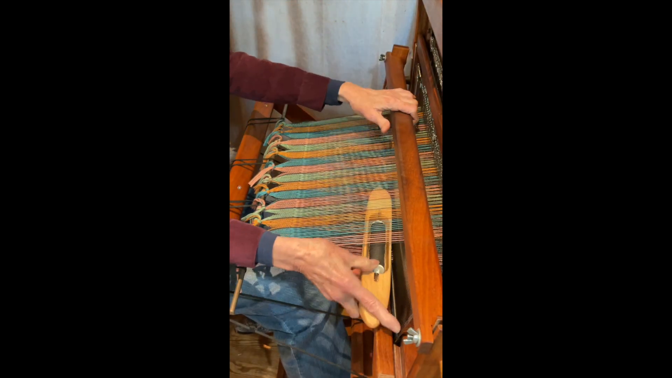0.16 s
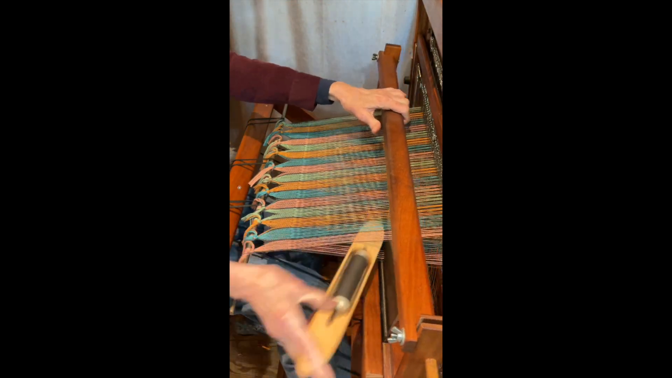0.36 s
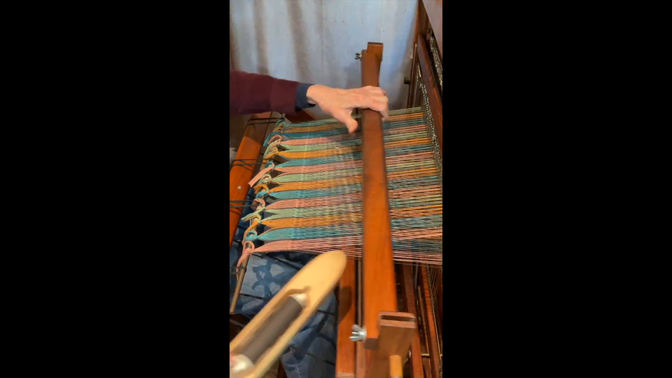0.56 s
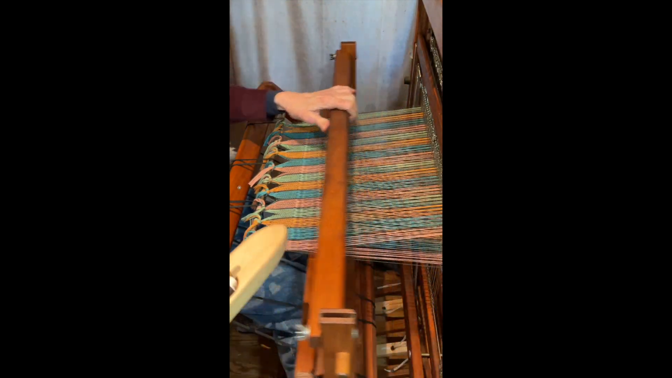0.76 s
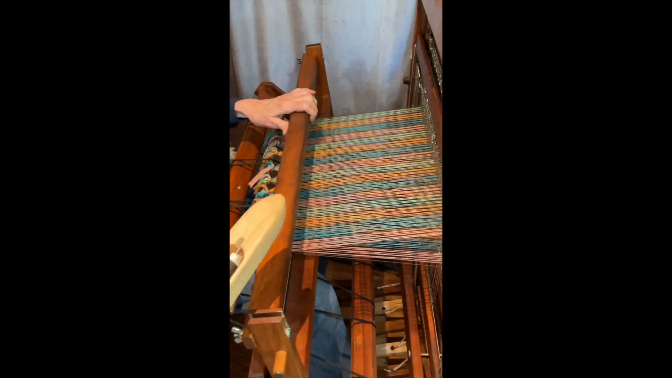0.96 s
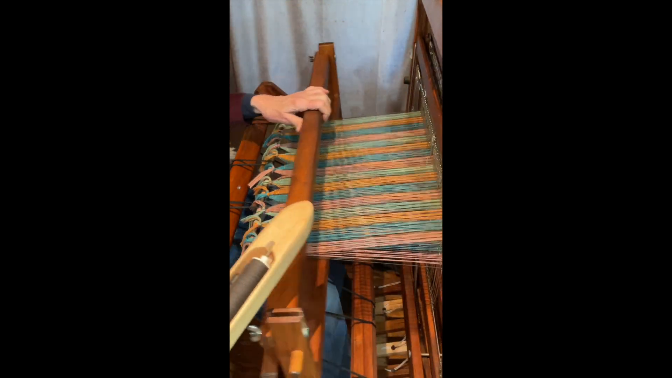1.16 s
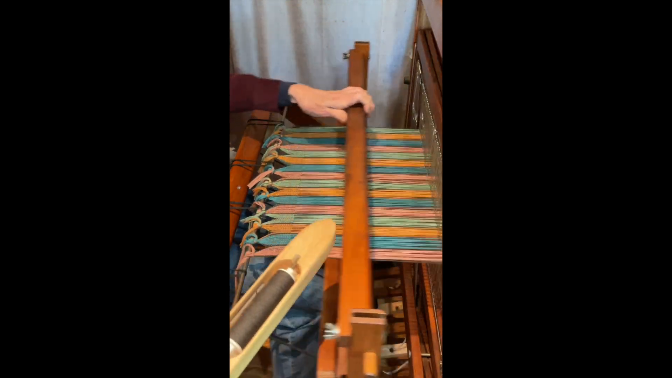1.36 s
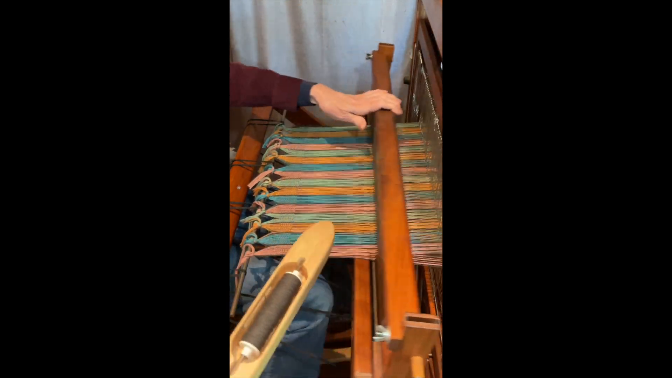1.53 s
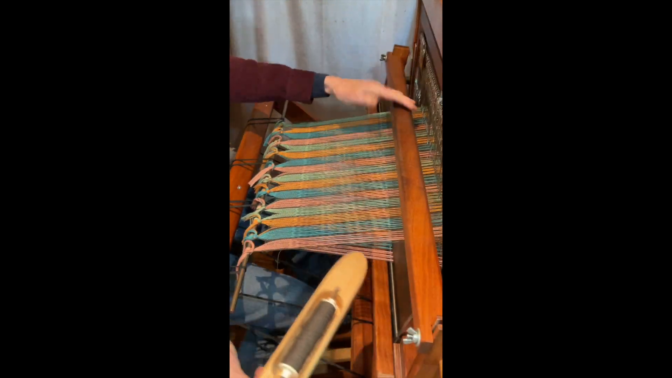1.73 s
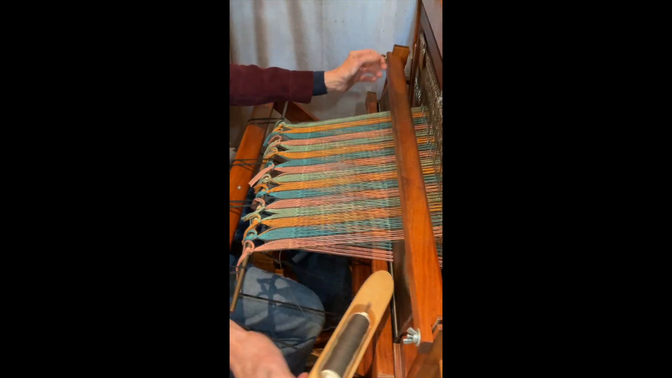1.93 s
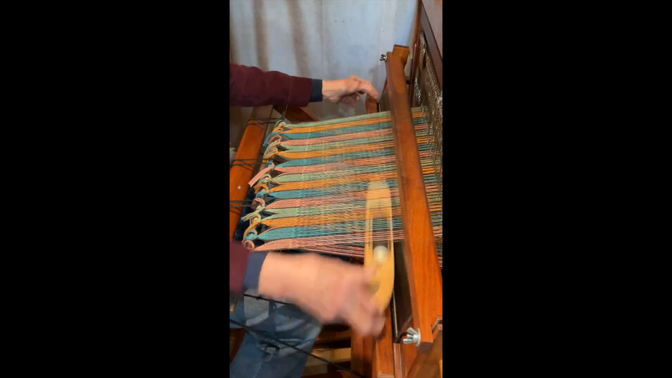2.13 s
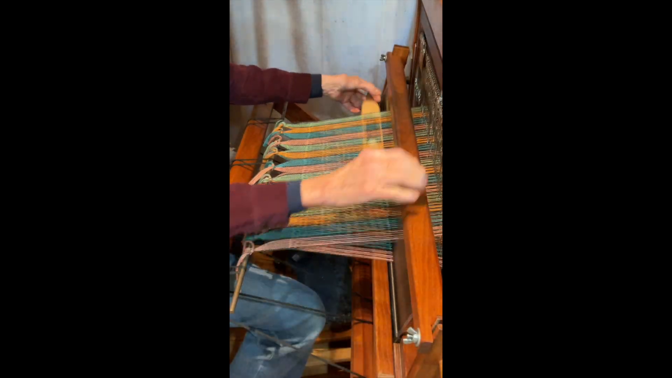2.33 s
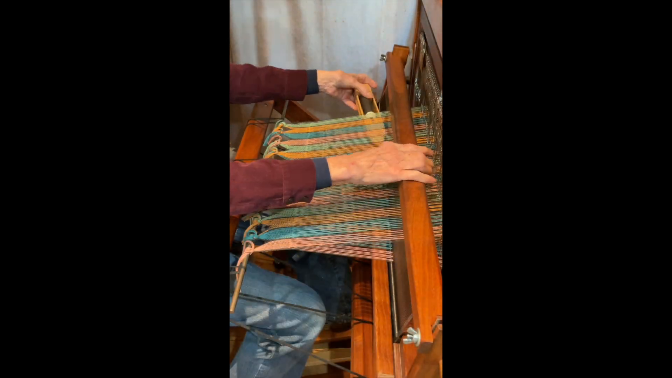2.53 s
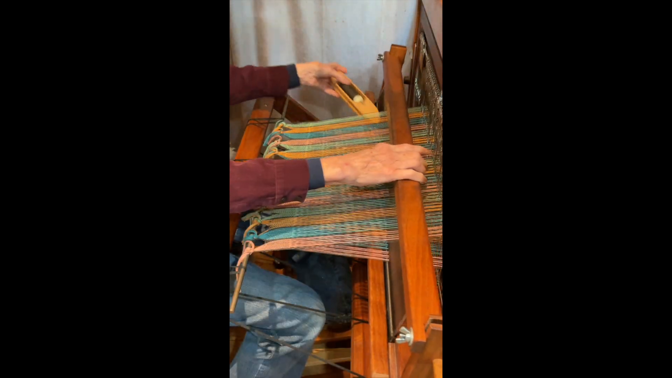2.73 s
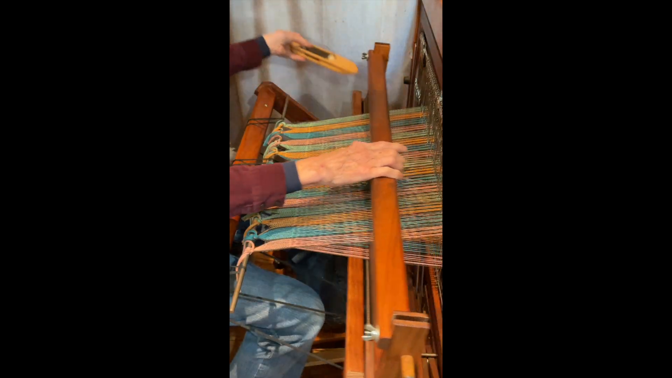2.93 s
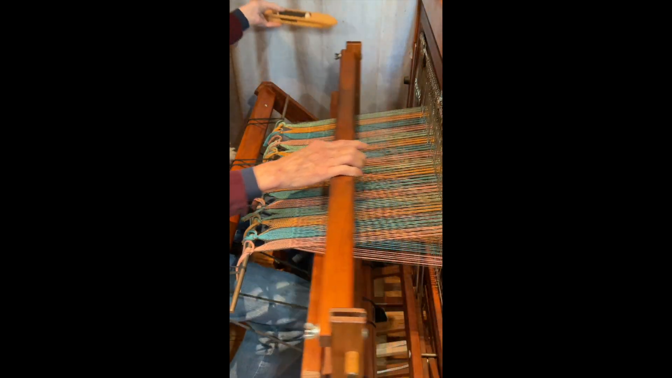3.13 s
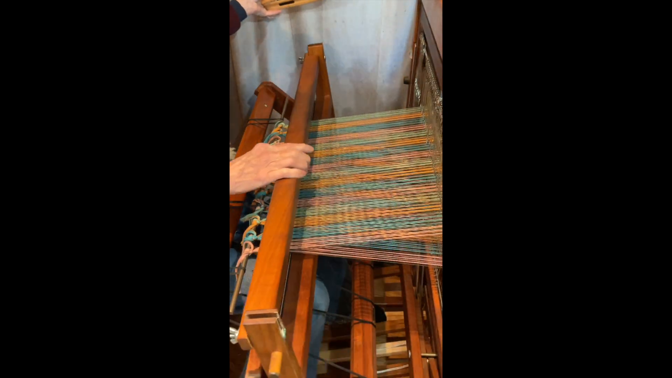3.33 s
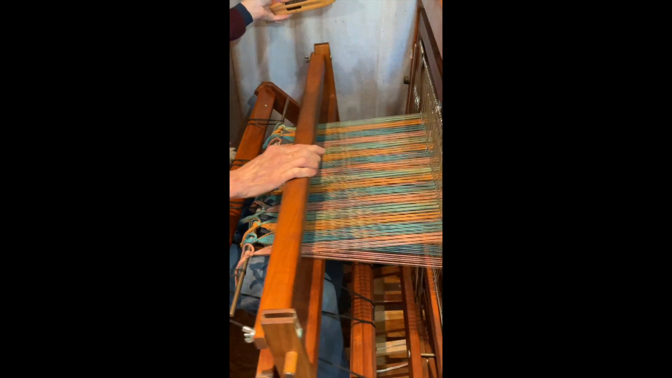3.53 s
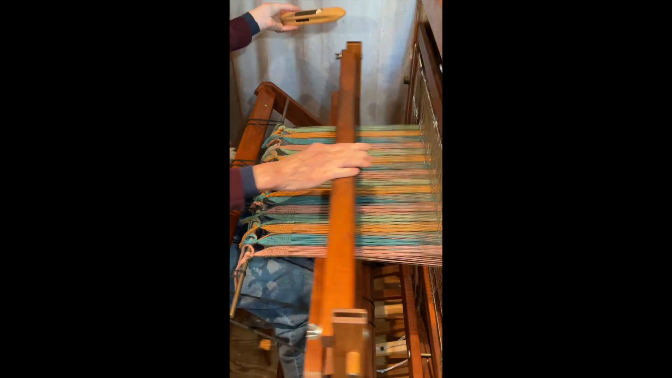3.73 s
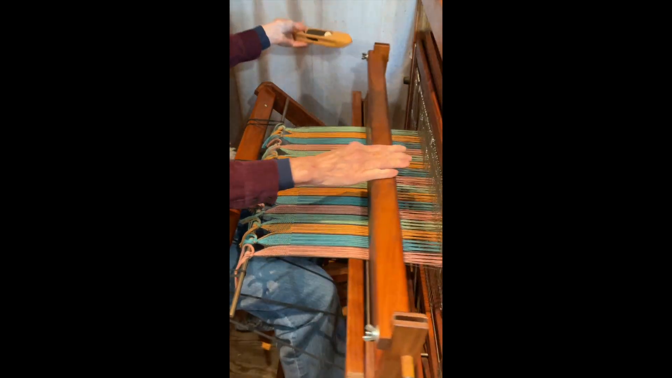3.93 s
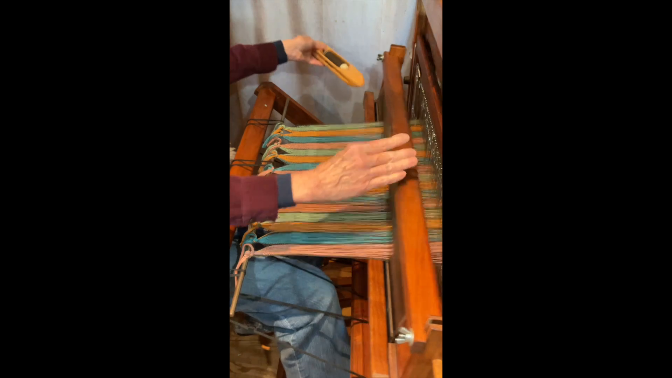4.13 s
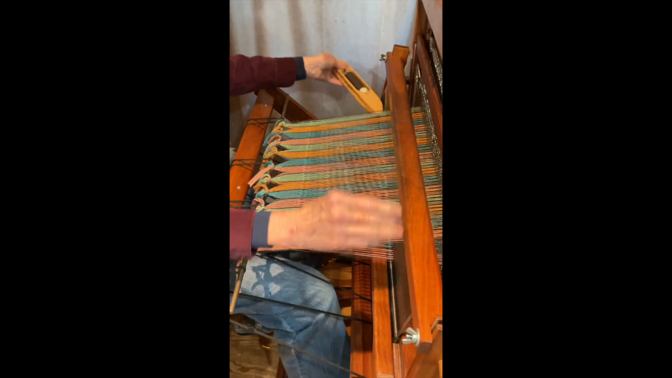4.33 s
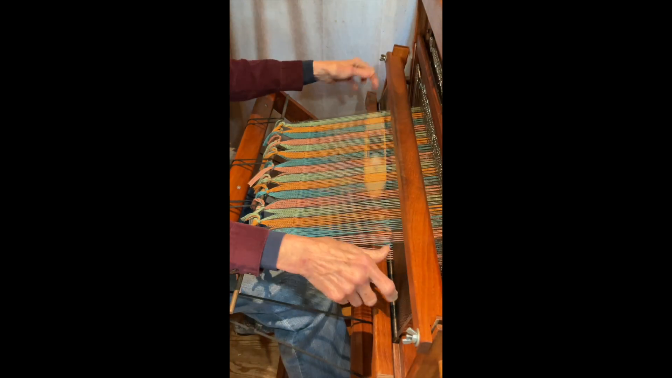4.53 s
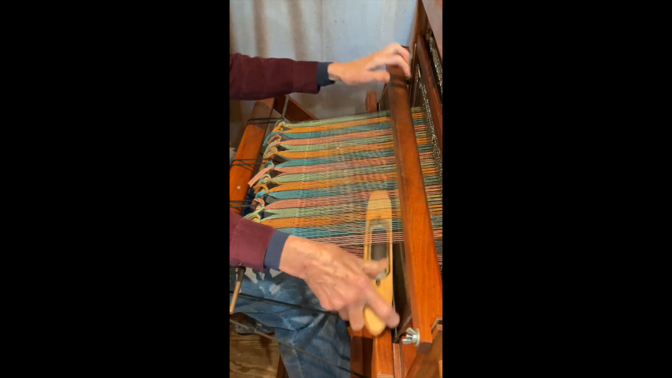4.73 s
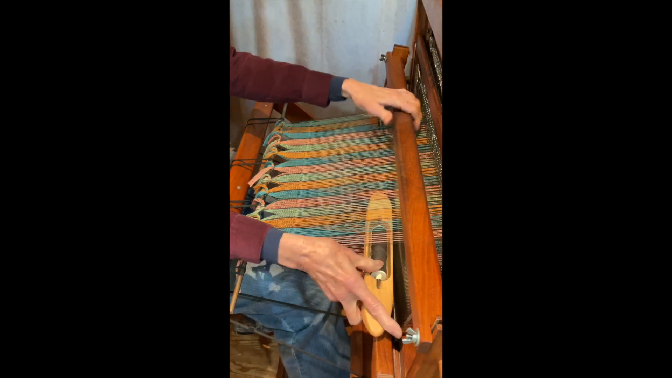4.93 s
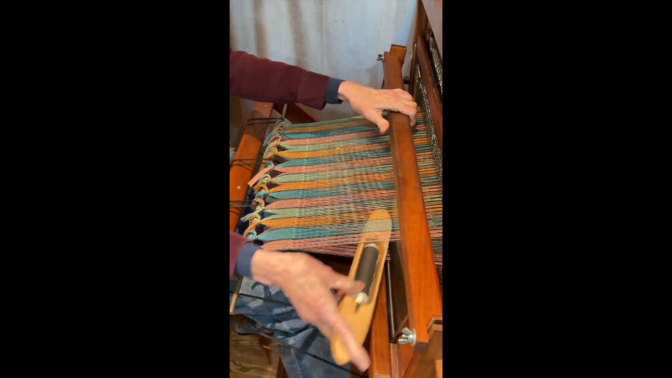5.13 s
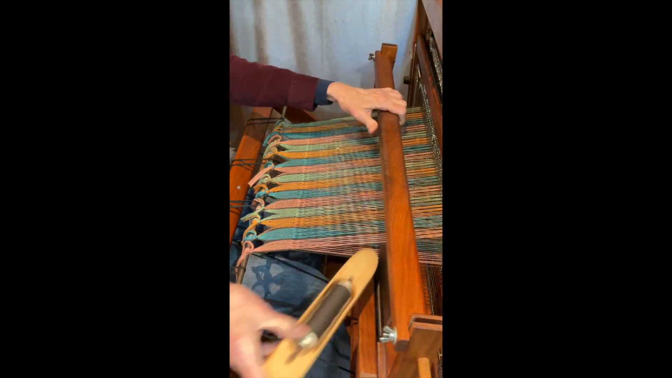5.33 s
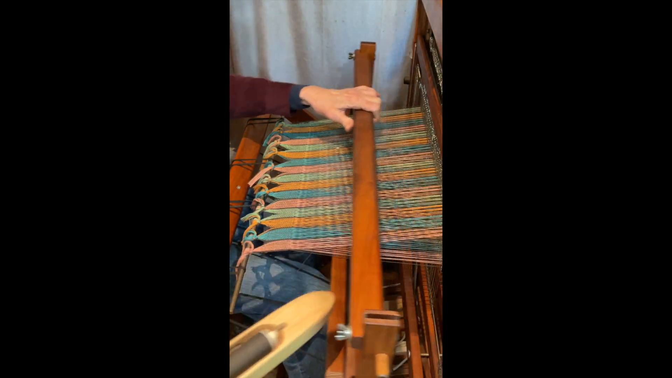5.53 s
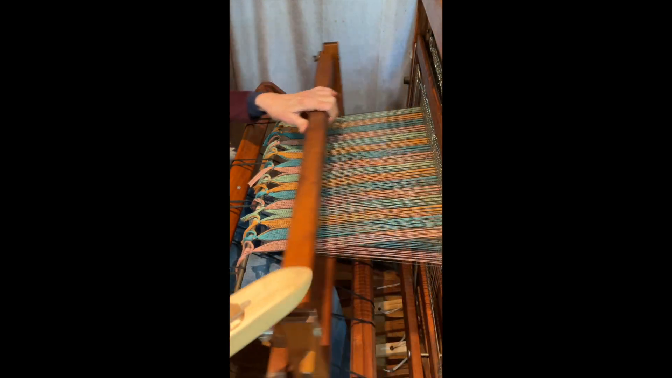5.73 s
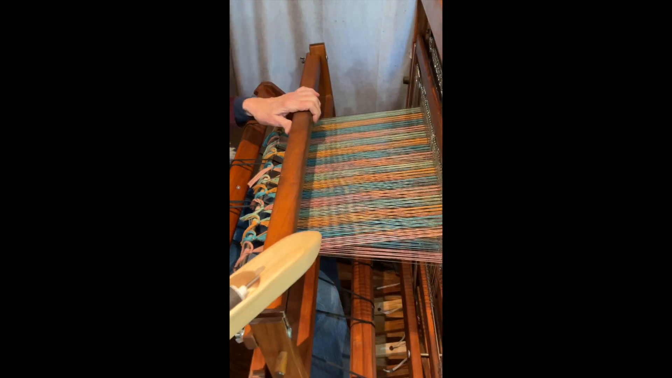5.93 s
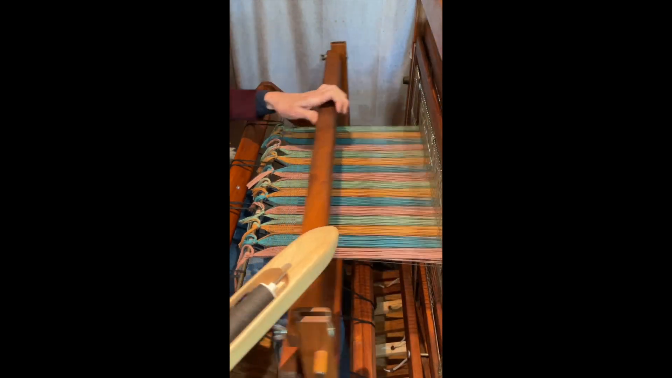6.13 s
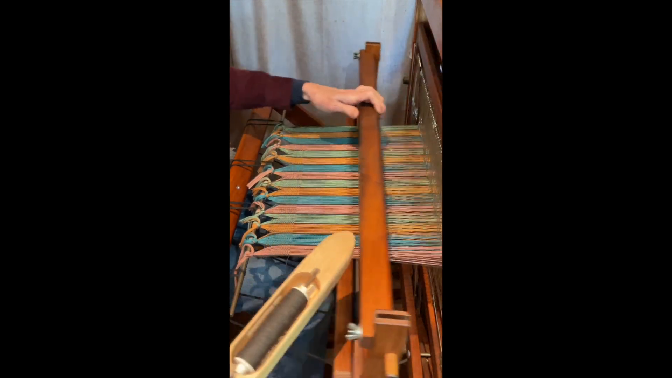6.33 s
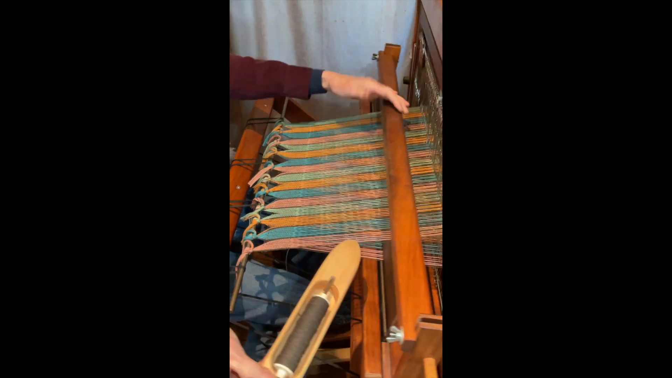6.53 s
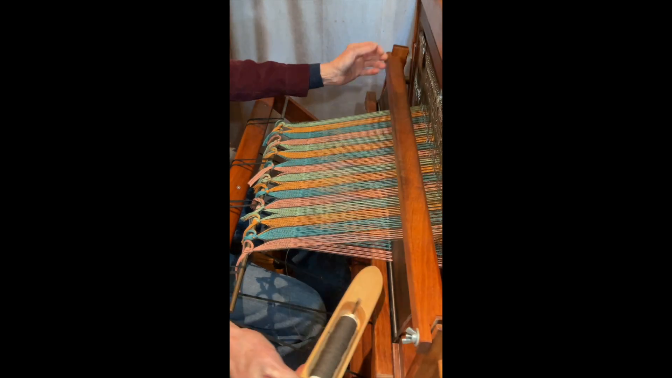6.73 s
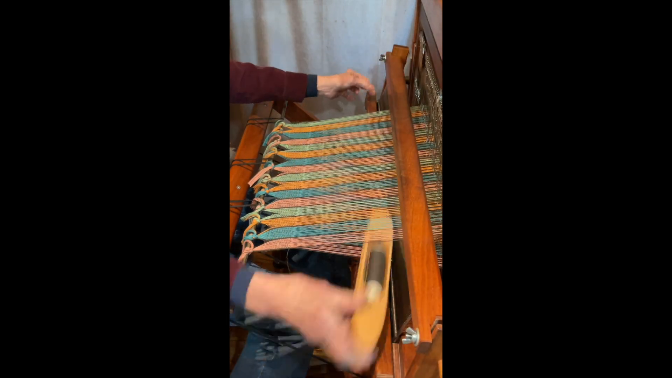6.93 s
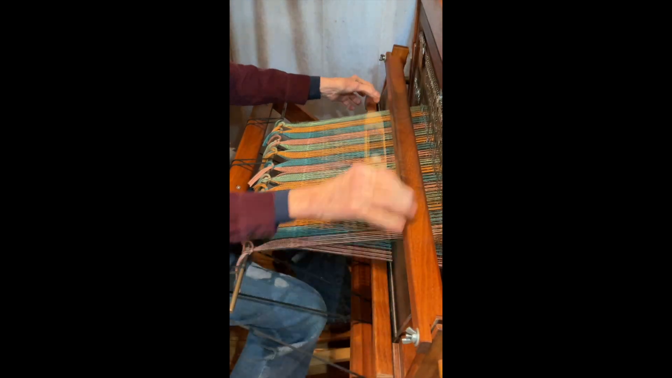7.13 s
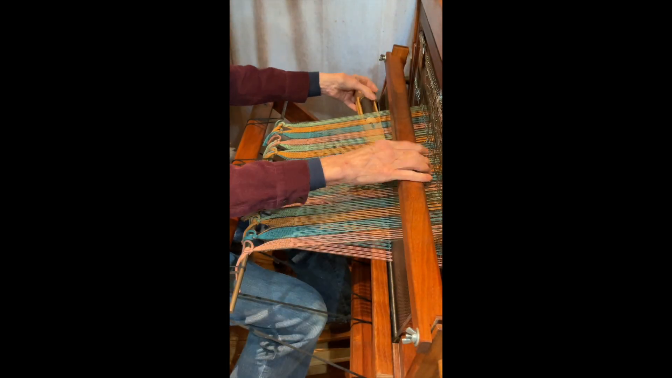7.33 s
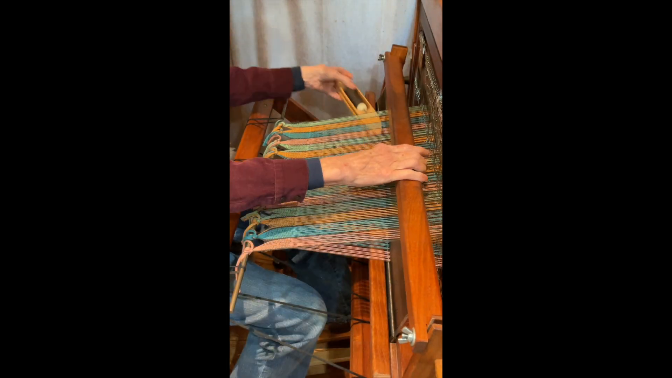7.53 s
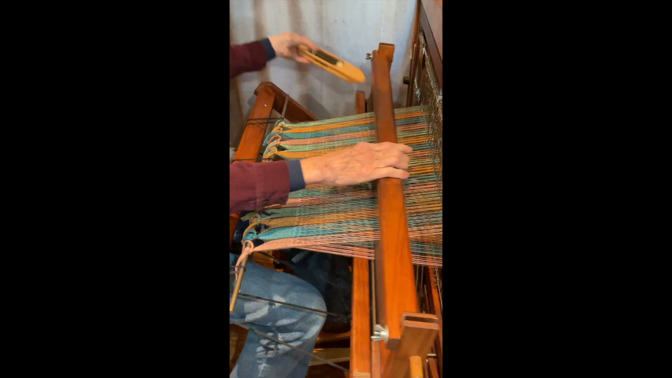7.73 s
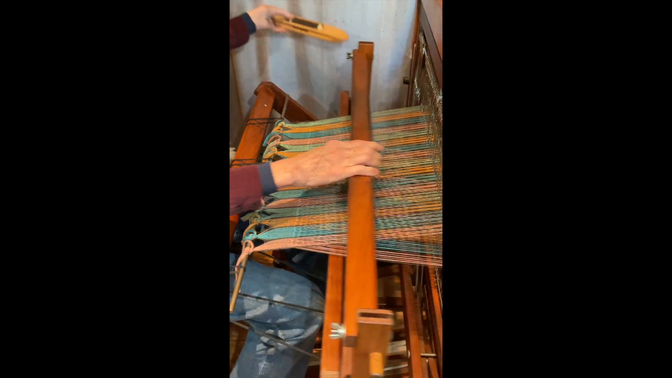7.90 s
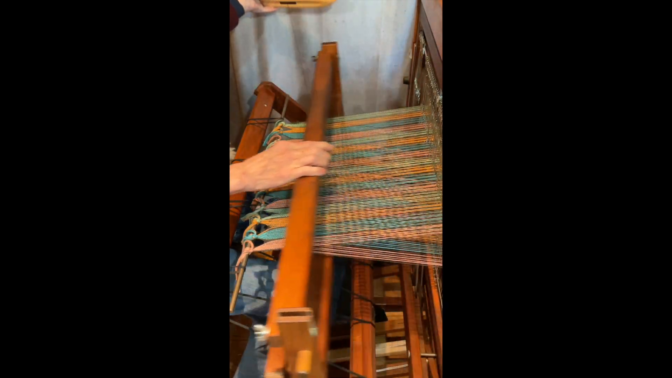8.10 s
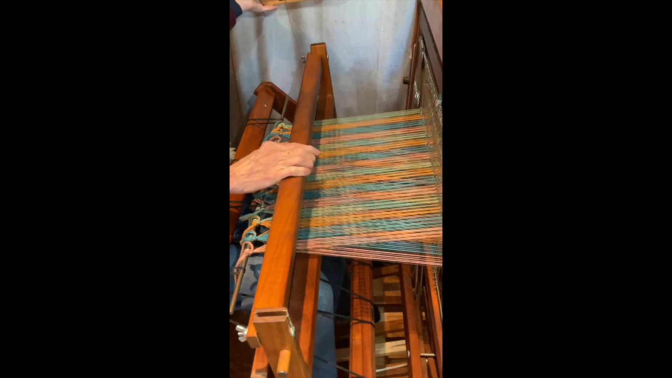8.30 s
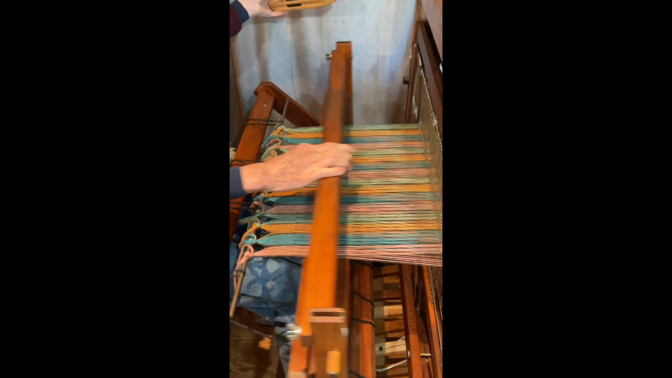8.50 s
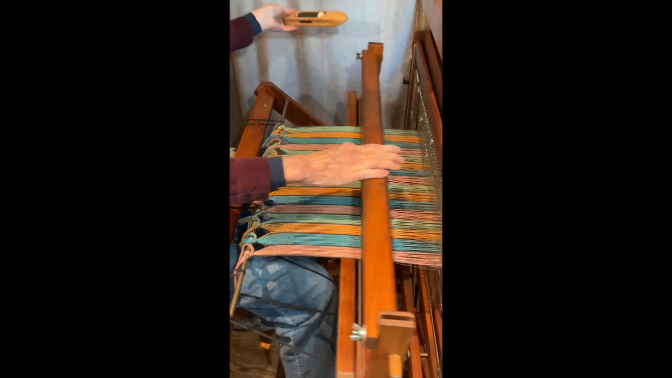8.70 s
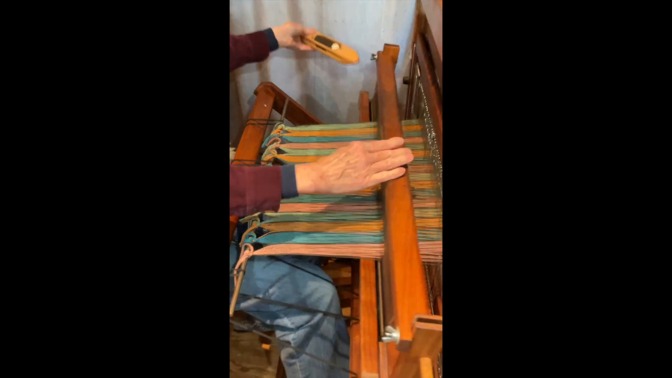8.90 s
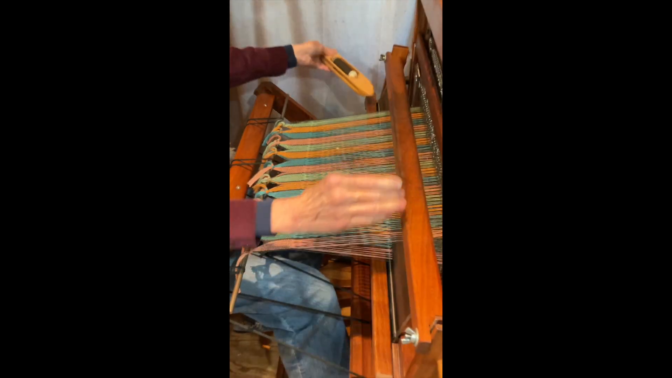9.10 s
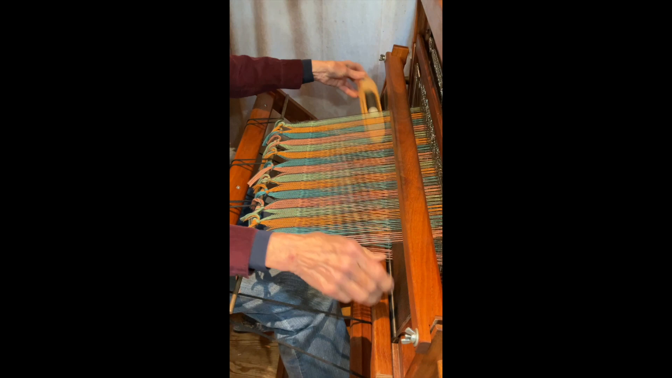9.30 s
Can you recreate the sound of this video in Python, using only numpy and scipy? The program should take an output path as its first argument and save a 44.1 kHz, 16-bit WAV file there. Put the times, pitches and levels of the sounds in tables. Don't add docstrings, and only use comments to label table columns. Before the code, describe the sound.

Close in a small, dry room, a wooden floor loom repeats its cycle. Yarn hisses and a loose bobbin clicks, the beater knocks with a bright thread swish, shafts and treadles clatter over a low floor boom, the beater swings back, then the hollow shuttle is thrown and caught with quick clacks and rattles. About three full rounds pass, and a fourth throw begins at the end.

```python
import sys
import numpy as np
from scipy import signal
from scipy.fft import rfft, irfft, next_fast_len
from scipy.io import wavfile
from scipy.ndimage import uniform_filter1d

SR = 44100
rng = np.random.default_rng(int(sys.argv[2]) if len(sys.argv) > 2 else 0)


def pcm_store(signal):
    levels = np.round(np.clip(np.atleast_2d(signal), -1, 1) * 32767)
    wavfile.write(sys.argv[1], SR, levels.astype(np.int16).T)


def decibels_to_gain(level_db):
    exponent = np.asarray(level_db, float) / 20
    return 10 ** exponent


N = 417186


def rms_one(x):
    return x / np.sqrt(np.mean(x ** 2) + 1e-20)


def filtered(x, order, hz, kind="low"):
    return signal.sosfilt(signal.butter(order, hz, kind, fs=SR, output="sos"), x)


def at_hz(points, hz):
    point_hz, point_db = np.transpose(points)
    return np.interp(np.log(hz), np.log(point_hz), point_db)


def drift(per_s):
    knots = rng.standard_normal(N // 20 + 2)
    return np.interp(np.arange(N) * per_s / SR, np.arange(len(knots)), knots)


def rings(modes, length_s):
    hz, db, t60 = np.transpose(modes)[:, :, None]
    t = np.arange(int(length_s * SR)) / SR
    return decibels_to_gain(db - 60 * t / t60) * np.sin(2 * np.pi * hz * t)


def ring_together(x, modes, length_s):
    body = rings(modes, length_s).sum(axis=0)
    return signal.fftconvolve(x, body / np.sqrt(np.sum(body ** 2)))[:N]


def grains(per_s, spread_db):
    sizes = decibels_to_gain(spread_db * np.minimum(rng.exponential(1, N), 4))
    signs = rng.choice([-1, 1], N)
    return sizes * signs * (rng.random(N) < per_s / SR)


def coloured(x, spectrum, patchy_db):
    size = next_fast_len(N)
    hz = np.maximum(np.arange(size // 2 + 1) * SR / size, 1)
    low_hz, high_hz = spectrum[0][0], spectrum[-1][0]
    shaped = rfft(x, size) * decibels_to_gain(at_hz(spectrum, hz))
    shaped *= (hz > low_hz / 2) & (hz < high_hz * 2)
    step = np.log(high_hz / low_hz) / 5
    out = 0
    for centre in np.geomspace(low_hz, high_hz, 6):
        window = np.clip(1 - np.abs(np.log(hz / centre)) / step, 0, 1)
        out = out + irfft(shaped * window, size)[:N] * decibels_to_gain(patchy_db * drift(40))
    return rms_one(out)


# start_s, level_db
SLIDES = [
    [(0, -49), (.068, -56), (.106, -68), (.2, -54.5), (.317, -49.5), (.684, -58.5), (.9, -56.5)],
    [(1.95, -50.5), (2.115, -40.5), (2.16, -47.5), (2.6, -55), (2.8, -74.5), (2.87, -49.5), (2.95, -49),
     (3.31, -54.5)],
    [(4.3, -85), (4.45, -42), (4.661, -44), (4.84, -62), (4.981, -61.5), (5.166, -47.5), (5.4, -48),
     (5.773, -56.5)],
    [(6.75, -54), (6.9, -40.5), (7.1, -46), (7.56, -61.5), (7.75, -59), (8.143, -52.5)],
    [(9.2, -55), (9.459, -45.5)],
]


def sliding():
    s, db = np.transpose(sum(SLIDES, []))
    return decibels_to_gain(np.interp(np.arange(N) / SR, s, db))


# start_s, level_db
BOBBIN_RUB = [
    [(0.2, -58), (0.321, -44), (0.581, -49.5), (0.702, -59), (0.764, -57), (0.898, -60)],
    [(1.95, -41), (1.991, -36.5), (2.193, -49), (2.422, -36), (2.514, -36.5), (2.808, -75), (2.923, -45),
     (3.247, -63)],
    [(4.298, -43), (4.44, -37.5), (4.627, -52.5), (4.749, -38.5), (4.867, -57), (4.97, -62)],
    [(4.99, -62), (5.07, -56), (5.2, -53), (5.25, -59), (5.3, -58), (5.45, -45), (5.571, -51.5),
     (5.637, -42), (5.777, -48.5)],
    [(6.799, -43), (7.016, -50.5), (7.058, -34), (7.188, -51), (7.263, -42), (7.379, -37.5), (7.545, -65.5),
     (7.716, -47.5), (8.118, -58)],
    [(9.25, -43), (9.447, -47.5)],
]


def rub_level():
    t = np.arange(N) / SR
    return sum(decibels_to_gain(np.interp(t, *np.transpose(spell), left=-140, right=-140)) for spell in BOBBIN_RUB)


def shuttle_in_play():
    return uniform_filter1d(1. * (rub_level() > 1e-5), size=2000)


# start_s, rise_s, swish_db, fall_db_per_s, rumble_over_swish_db
STROKES = [(0.925, 0.056, -25.5, 120, -15), (1.214, 0.18, -31.5, 104, -7.5),
           (1.718, 0.069, -31.5, 146, -8.5), (3.323, 0.056, -27, 110, -13.5), (3.72, 0.13, -29.5, 68, -7.5),
           (4.172, 0.06, -26.5, 122, -11), (5.803, 0.053, -28.5, 106, -15.5),
           (6.064, 0.17, -31.5, 117, -9.5), (6.629, 0.049, -28, 103, -10.5), (8.17, 0.046, -24, 158, -14.5),
           (8.532, 0.14, -30, 93, -8.5), (9.003, 0.064, -27.5, 173, -17), (1.96, 0.038, -52, 49, -18),
           (2.16, 0.0051, -39, 120, -1.5), (2.342, 0.069, -36.5, 153, -13.5),
           (4.699, 0.0062, -45.5, 92, -2.5), (7.026, 0.0078, -31.5, 307, -3.5),
           (7.2, 0.077, -41, 123, -9.5), (7.66, 0.083, -42, 103, -21), (9.222, 0.024, -45, 64, -1.5)]


def strokes(start_db, fall_share, timber=False):
    out = np.zeros(N + SR)
    t = np.arange(SR * 2 // 3) / SR
    for s, rise_s, db, fall, rumble_db in STROKES:
        after = np.maximum(t - rise_s, 0)
        approach = np.maximum(1 - t / rise_s, 0) ** 2
        swell = decibels_to_gain(db + timber * rumble_db + start_db * approach)
        sway = decibels_to_gain(-34 - 66 * after)
        at = round(s * SR)
        out[at:at + len(t)] += swell * (decibels_to_gain(-fall * fall_share * after) + sway)
    return out[:N]


def timber_strokes():
    return strokes(start_db=-6, fall_share=0.64, timber=True)


# start_s, level_db
TREADLES = [(3.92, -43), (8.48, -47.5), (1.755, -34), (2.22, -48), (3.6, -55), (3.78, -45), (4.22, -46),
            (4.55, -55), (5.88, -58), (6.18, -45), (6.65, -46), (8.73, -39.5), (9.07, -39.5)]
# pitch_hz, level_db, t60_s
FLOOR_MODES = [
    (75, -9, 0.75),
    (102.2, 0.5, 0.25),
    (146.3, 11.5, 0.064),
    (226.5, 1, 0.08),
]


def floor_boom():
    house_hum = decibels_to_gain(-79.5)
    shake = filtered(timber_strokes() * decibels_to_gain(-7.5), 1, 6.0) + house_hum + decibels_to_gain(-26) * sliding()
    near = np.arange(-3000, 3000)
    push = np.exp(-(near / SR / 0.032) ** 2)
    for s, db in TREADLES:
        shake[round(s * SR) + near] += decibels_to_gain(db) * push
    return ring_together(shake * rng.standard_normal(N), FLOOR_MODES, 0.29)


# pitch_hz, level_db (per Hz)
RUMBLE_COLOUR = [(120, -33.5), (200, -1), (290, -5.5), (460, -1), (800, -4), (1100, -7.5), (2200, -14.5)]


def shaft_rumble():
    still_db = -78.5
    gain = timber_strokes() + decibels_to_gain(-10) * sliding() + decibels_to_gain(still_db)
    rumble = gain * coloured(grains(2500, spread_db=2.3), RUMBLE_COLOUR, patchy_db=1.3)
    deep = filtered(rumble, 2, 550)
    return rumble + shuttle_in_play() * (deep - rumble)


# pitch_hz, level_db (per Hz)
SWISH_COLOUR = [(800, -25.5), (1150, -7.5), (2000, -2), (3800, -2), (5100, -0.5), (6300, -11), (9000, -24)]


def thread_swish():
    gain = strokes(start_db=-19, fall_share=1) + decibels_to_gain(-3.5) * sliding()
    swish = gain * decibels_to_gain(1.5) * coloured(grains(7000, spread_db=2.5), SWISH_COLOUR, patchy_db=1.3)
    thin = filtered(swish, 2, 2400, "high")
    return swish + shuttle_in_play() * (thin - swish)


# pitch_hz, level_db (per Hz)
SHEEN_COLOUR = [(4500, -10), (6500, 7), (9500, 10), (14000, 7.5), (17500, -1)]


def wire_sheen():
    gain = decibels_to_gain(-5.5) * strokes(start_db=-22.5, fall_share=1) + decibels_to_gain(-3.5) * sliding()
    sheen = gain * coloured(grains(6000, spread_db=1.0), SHEEN_COLOUR, patchy_db=2.0)
    dull = filtered(sheen, 1, 9000)
    return sheen + shuttle_in_play() * (dull - sheen)


def warp():
    lumps = decibels_to_gain(1.71 * drift(90))
    return (thread_swish() + wire_sheen()) * lumps + shaft_rumble()


def brief_tones(rows):
    width_hz, sag_share = 190, 0.015
    out, t = np.zeros(N + SR), np.arange(SR // 8) / SR
    for s, length_s, hz, db in rows:
        a, b = filtered(rng.standard_normal((2, len(t) + 2000)), 2, width_hz)[:, 2000:]
        turn = 2 * np.pi * hz * t * (1 - sag_share * (t / length_s - 1) / 2)
        shape = np.sin(np.pi * np.clip(t / length_s, 0, 1) ** 0.65)
        tone = (.7 * a.std() + a) * np.cos(turn) + b * np.sin(turn)
        at = round(s * SR)
        out[at:at + len(t)] += decibels_to_gain(db) * shape * rms_one(tone)
    return out[:N]


# start_s, length_s, pitch_hz, level_db
SINGING = [(1.209, 0.035, 983, -37), (1.962, 0.014, 2705, -17.5), (1.988, 0.028, 2790, -29),
           (2.355, 0.03, 1200, -46), (2.488, 0.021, 1205, -33), (3.96, 0.16, 4180, -45),
           (5.115, 0.012, 2820, -37), (5.147, 0.035, 2770, -38), (5.222, 0.16, 2250, -48),
           (5.319, 0.029, 1200, -53), (7.315, 0.036, 1200, -28), (8.81, 0.11, 4150, -42),
           (9.283, 0.027, 2160, -49), (5.12, 0.1, 255, -56), (6.52, 0.057, 277, -43),
           (2.89, 0.15, 7540, -55), (3.02, 0.19, 7560, -55), (6.387, .03, 6930, -38)]


def singing_parts():
    return brief_tones(SINGING)


# start_s, length_s, pitch_hz, level_db
THREAD_TONES = [(0.591, .05, 516, -58), (2.088, 0.017, 2850, -36), (4.44, 0.067, 1192, -39),
                (4.475, 0.025, 2850, -51), (4.502, 0.011, 3220, -26), (4.581, 0.036, 4760, -58),
                (4.581, 0.043, 3250, -48), (4.627, 0.024, 3900, -43), (4.668, 0.035, 2760, -33.5),
                (4.75, 0.057, 488, -44.5), (5.254, 0.033, 470, -60), (5.5, 0.041, 517, -53),
                (6.9, 0.065, 2900, -35), (6.97, 0.038, 5530, -44), (7.599, 0.039, 507, -54.5),
                (9.325, 0.025, 3800, -38)]


def singing_threads():
    return brief_tones(THREAD_TONES)


SCRAPE_HZ = [2640, 3100, 4140, 5370, 6130, 7640]


def scrape():
    catches = grains(740, spread_db=3) + 1e-18
    t60_s, tilt_db, swing_db = .008, -0.5, 6
    r = decibels_to_gain(-60 / (t60_s * SR))
    out = 0
    for k, hz in enumerate(SCRAPE_HZ):
        resonance = [1, -2 * r * np.cos(2 * np.pi * hz / SR), r * r]
        ring = signal.lfilter([1, 0, -1], resonance, np.roll(catches, 9001 * k))
        out = out + ring * decibels_to_gain(tilt_db * k + swing_db * drift(18))
    read = np.cumsum(decibels_to_gain(.3 * drift(12)))
    glided = np.interp(read * N / read[-1], np.arange(N), out)
    return decibels_to_gain(-1) * sliding() * rms_one(glided)


# pitch_hz, level_db, t60_s
SHUTTLE_MODES = [(1230, -48, 0.11), (1200, 0, 0.074), (2122, -3.5, 0.035), (2198, 10, 0.036),
                 (2353, 7, 0.013), (2730, 8.5, 0.0097), (3300, -3.5, 0.036), (3870, -5.5, 0.014),
                 (4470, 5, 0.023), (5170, 6.5, 0.011), (7920, -10, 0.024), (8395, -5, 0.022)]


def bobbin():
    wobble = drift(45)
    level = uniform_filter1d(rub_level(), size=900)
    rolling = rms_one(grains(800, spread_db=3.5) * decibels_to_gain(4 * wobble)) * level
    taps = rms_one(grains(150, spread_db=3.0)) * level * decibels_to_gain(-8)
    click = rms_one(rng.standard_normal(400)) * decibels_to_gain(np.linspace(-20, -60, 400))
    crack = signal.fftconvolve(taps, click)[:N]
    rub = ring_together(rolling + taps, SHUTTLE_MODES, 0.089)
    sway = np.cumsum(.03 * wobble[::-1])
    rub = np.interp(np.arange(N) + sway - uniform_filter1d(sway, size=4000), np.arange(N), rub)
    return decibels_to_gain(1.5) * filtered(rub, 3, [1050, 3400], "band") + decibels_to_gain(-23.0) * np.gradient(crack)


# pitch_hz, level_db
TIMBER_COLOUR = [(300, 1.5), (1200, 6.5), (4500, -0.5), (6500, -3), (16000, -12.5)]


def timber_modes():
    hz = np.geomspace(300, 15500, 90) * decibels_to_gain(rng.normal(0, 0.054, 90))
    return np.transpose([hz, at_hz(TIMBER_COLOUR, hz), .004 + 15 / hz])


def strike(rows, timber, low_db, upper_db, upper_share, hollow_db, bass_db):
    wood = rings(timber, .1)
    hz = np.vstack([SHUTTLE_MODES, timber])[:, 0]
    hollow = np.arange(len(hz)) < len(SHUTTLE_MODES)
    out, t = np.zeros(N + SR), np.arange(2600) / SR
    for s, db, high_db, contact_ms, lowest_db in rows:
        spread, grip = rng.standard_normal((2, len(hz)))
        held = np.array(SHUTTLE_MODES) * decibels_to_gain(grip[hollow, None] * [.2, 0, 2]) * [1, 1, .85]
        colour = [(500, low_db + lowest_db - 11.0), (1200, low_db + lowest_db - 1.5), (2300, 0.0043),
                  (4200, upper_db + upper_share * high_db), (8000, high_db + 3.5)]
        chance_db = np.where(hollow, 2.2, 2.54) * np.abs(spread)
        strength = decibels_to_gain(at_hz(colour, hz) + hollow_db * hollow + chance_db)
        body = strength * np.sign(spread) @ np.vstack([rings(held, .1), wood])
        contact = t / np.clip(contact_ms / 1e3, .0003, .04)
        pressure = np.exp(-contact ** 2) + 0.31 * np.exp(-contact / 2.7) * (1 - t / t[-1])
        pressure *= 1 + 1.5 * np.exp(-t / 0.00022)
        noise = rng.standard_normal(len(t))
        grit = np.sign(noise) * np.abs(noise) ** 2.76
        sound = signal.fftconvolve(body, grit * pressure)
        kept = min(decibels_to_gain(bass_db), 1)
        sound = kept * sound + (1 - kept) * filtered(sound, 8, 1080, "high")
        loudest = np.sqrt(uniform_filter1d(sound ** 2, size=110).max())
        at = round(s * SR)
        out[at:at + len(sound)] += decibels_to_gain(db) * sound / loudest
    return filtered(out[:N], 2, 260, "high")


# start_s, peak_db, brightness_db, contact_ms, low_modes_db
JOSTLES = [(.005, -40.5, -2, 76, -23.5), (1.754, -39, -23, 1.6, -8), (1.83, -26.5, -19, 8, 1),
           (3.366, -28, -6, 14, -4), (3.83, -20, 19, 60, -19), (3.895, -19.5, 15, 27, 13.5),
           (4.022, -34, -25, 3.3, 31), (4.195, -18.5, -26, 8, 5), (5.126, -38, -32, 8.3, 0),
           (6.1445, -28, 5, 37, 18), (6.202, -29.5, -14, 5.5, 11), (8.192, -54, 9, 19, -9),
           (8.21, -29, -20, 8.5, -5), (8.70, -20.5, 12, 34, 13), (9.036, -20.5, -33, 20, 1),
           (9.267, -30, -27, 4.9, 28)]


def shaft_jostles(timber):
    return strike(JOSTLES, timber, low_db=-12, upper_db=12.4, upper_share=0.47, hollow_db=-24, bass_db=0)


# start_s, peak_db, brightness_db, contact_ms, low_modes_db
BUMPS = [(.0916, -44, -11, 32, 4), (1.2094, -27, -29, 17, -6), (1.691, -31.5, -38, 5.1, -5),
         (3.527, -31, -35, 6.4, 22), (3.722, -33, -16, 16, 17), (3.8790, -14, -2, 1.3, -2),
         (4.073, -34.5, -18, 5.5, 7), (4.352, -27, -14, 30, -1), (6.0574, -25.5, -17, 15, 2),
         (6.532, -38, -22.5, 6.4, 0.5), (6.6, -43.5, -26, 11, 10), (8.37, -36, -24, 6.8, 1),
         (8.6870, -14.5, -6, 3, -3.5), (8.540, -25, 9, 43, 0), (8.978, -37, -7, 21, -11),
         (9.228, -27.5, -9, 13, -13), (9.2385, -21, -5, 7.8, 0), (.18, -46, -28, 46, 12)]


def frame_bumps(timber):
    return strike(BUMPS, timber, low_db=5.4, upper_db=9.3, upper_share=0.44, hollow_db=-11, bass_db=0)


# start_s, peak_db, brightness_db, contact_ms, low_modes_db
ROLLS = [(5.0397, -40.5, -25, 12, 23), (5.118, -46, -27, 1, 15), (5.1473, -40, -21, 9.6, 13),
         (5.2463, -36, 7, 0.88, 2), (5.2737, -43, -10, 3.8, -12), (5.3206, -28.5, -35, 11, 19),
         (5.3414, -26, -26, 2.4, 4), (5.3539, -27, -34, 3.2, 7), (5.3675, -26.5, -15, 2.2, -11),
         (5.3969, -41, -19, 3, -4), (5.4195, -32.5, -19, 1.7, -6), (5.4296, -37, -32, 5.2, -7),
         (5.456, -34, -27, 3.2, 12), (5.4618, -30.5, -13, 6.2, 3), (5.487, -32, -43, 13, -7),
         (5.5086, -27, -10, 8.3, 7), (5.521, -34, -32, 6, 5), (5.605, -29, -22, 8.4, -1),
         (5.6167, -27.5, -20, 4.1, 2), (5.653, -32, -24, 7.9, -2), (5.7085, -31.5, -19, 3.6, 1)]


def bobbin_rolls(timber):
    return strike(ROLLS, timber, low_db=-10, upper_db=7.2, upper_share=0.77, hollow_db=14.7, bass_db=-29)


# start_s, peak_db, brightness_db, contact_ms, low_modes_db
TICKS = [(.2664, -37.8, -13, 4.4, -4), (.3222, -19.5, 1, 4.2, -5), (.347, -35, -15, 3, 2),
         (.3694, -24.5, 0, 1, -6), (.3874, -24, 2, 1.8, 14.5), (.429, -28, -23, 1.5, -13),
         (.4478, -31.5, -20, 12, 1), (.5023, -30.5, -15, 5.7, -2), (.5355, -34.5, -29, 1.1, 10),
         (.583, -29, -9, 2.2, 2), (.5896, -30.5, -21, 15, -13), (.734, -34, -43, 11, 6),
         (.7477, -28.5, -35, 5, -20), (.768, -39.5, -25, 3.8, 11), (7.867, -34, -13, 12, -2),
         (7.887, -37, -2, 6.4, -1), (7.914, -38, -26, 2, -5), (7.978, -44, -26, 7.3, 19)]


def bobbin_ticks(timber):
    return strike(TICKS, timber, low_db=-12, upper_db=5, upper_share=0.51, hollow_db=14, bass_db=-25)


# start_s, peak_db, brightness_db, contact_ms, low_modes_db
JOLTS = [(1.991, -25.5, -11, 10, 9), (2.0364, -27.5, -22, 13, 6.5), (2.1708, -17.5, 2.5, 8, 15),
         (2.1847, -18.5, 5, 5.7, 6), (2.258, -23.5, 4.5, 10, 0), (2.3176, -19.5, -6, 15.6, -9),
         (2.3565, -18.5, 13, 6.6, -3), (2.394, -37, 0, 4, 9), (2.4482, -23, -12, 9, 0),
         (2.484, -26.5, -3, 3, 0), (2.526, -24.5, -6, 5.1, 13), (2.8568, -39.5, 8, 2.7, -3.5),
         (3.0013, -30.5, -11, 2.5, -8), (3.1079, -31, -1, 3.8, -8), (4.5044, -33.5, 20, 6.8, -9),
         (4.666, -28.5, 21, 11, -5), (4.7562, -25, 19, 4.8, 7), (4.765, -28.5, -3, 11, -14),
         (6.826, -21, -2, 5.1, 0), (7.040, -15, -3, 7.5, 7), (7.272, -24.5, 0, 2.3, 4),
         (7.327, -19, 7, 3.9, -8), (7.362, -30, -2, 12, 4), (7.388, -22.5, -2.5, 2.8, -12),
         (7.5948, -35, 6, 4.5, -5), (7.6682, -33, -7, 12, -7), (7.7325, -19.5, 2, 3.9, -4),
         (7.746, -32, -10, 26, 9), (9.284, -34, -7, 3, 0)]


def bobbin_jolts(timber):
    return strike(JOLTS, timber, low_db=-16, upper_db=2.8, upper_share=0.36, hollow_db=5.7, bass_db=-15)


# start_s, peak_db, brightness_db, contact_ms, low_modes_db
CLACKS = [(.2923, -19.5, -14, 3.3, 0), (.2995, -20, -23, 4.9, -19), (1.9629, -13, -8, 3.1, 1.5),
          (2.160, -24.5, -38, 7.1, 6), (2.2313, -21.5, -17, 10, -8.5), (2.308, -22.5, -6, 7.5, -7),
          (2.405, -14, 4, 10, -6), (2.432, -26, -25, 4.5, 23), (2.491, -23, 7.5, 9.1, 6),
          (2.9084, -31, -6, 4.6, -6), (4.4114, -18, -16.5, 2.1, -8.5), (4.4426, -28, 1, 16, 1),
          (4.496, -25.5, -16, 18, 0), (4.713, -29.5, -25, 2.8, 13), (4.7233, -15, -23, 8.3, -15.5),
          (5.0184, -38, 27, 2.2, 22), (5.641, -23, -13, 1.9, 3.5), (5.6789, -32, -21, 13, -7),
          (5.7198, -37, -26, 1.5, -7), (6.8131, -19.5, -26, 2.4, 17), (6.8646, -18, -12.5, 8, -22.5),
          (6.9074, -31, -10, 3.9, -3), (7.0278, -14, -22, 9.7, -4.5), (7.0705, -16, -5, 17, -17),
          (7.192, -34, 4, 9.5, -1), (7.233, -23.5, -7, 11, -14), (7.2473, -17, -3.5, 17, -2),
          (7.316, -21, -18, 6.7, -16), (7.7013, -22, -12, 13, -12)]


def shuttle_clacks(timber):
    return strike(CLACKS, timber, low_db=1.4, upper_db=2.2, upper_share=0.48, hollow_db=3.8, bass_db=-13)


# start_s, peak_db, brightness_db, contact_ms, low_modes_db
SNAPS = [(1.984, -19.5, 1, 1.8, 7), (3.3847, -17, -23, 4.2, -5), (3.988, -34.5, -11, 2.9, 27),
         (4.177, -13, -13, 16, 6), (5.8522, -31, -20, 11, -1.5), (8.2300, -17, -20, 4, -2),
         (8.7982, -22, -15, 0.86, 9.5), (9.0100, -11.5, -18, 14.6, 6), (9.3678, -10.5, -29, 5.4, -16),
         (9.421, -25.5, -6, 5.3, -11)]


def reed_snaps(timber):
    return strike(SNAPS, timber, low_db=-11.5, upper_db=8.8, upper_share=0.12, hollow_db=-13, bass_db=-9.5)


# start_s, peak_db, brightness_db, contact_ms, low_modes_db
KNOCKS = [(.928, -18.5, -20, 7.5, -5.5), (1.2648, -23.5, -20, .74, 5), (1.2956, -23.5, -1, 29, 7),
          (1.3221, -16.5, 15.5, 23, 7), (1.5387, -25, 14.5, 24, 17), (1.7302, -20.5, -33, 33, -5),
          (1.7746, -25.5, -27, 3, 3.5), (3.3280, -16, -15, 0.31, -2.5), (3.755, -22, 5.5, 31, 9),
          (4.3274, -18.5, -31, 6, -2.5), (5.81, -15, -6, 0.7, -11), (6.1185, -25, -48, 2.8, 3),
          (6.1712, -13.5, 19, 4.6, 10), (6.3864, -27, 31, 8.4, 0), (6.6347, -15, -10, 12, -5),
          (8.1723, -28.5, -26, 1, -11), (8.628, -20, 14, 56, -15), (9.002, -23, -18, 20, 8)]


def beater_knocks(timber):
    return strike(KNOCKS, timber, low_db=-8, upper_db=10.4, upper_share=0.39, hollow_db=-9.5, bass_db=-1.5)


def room(x):
    t60_s, level_db, wall_cut_hz = .25, -17, 6000
    t = np.arange(SR // 2) / SR
    tail = rng.standard_normal(len(t)) * decibels_to_gain(-60 * t / t60_s) * (t > .004)
    tail = filtered(tail, 1, wall_cut_hz)
    return decibels_to_gain(level_db) * signal.fftconvolve(x, tail / np.sqrt(np.sum(tail ** 2)))[:N]


def scene():
    beds = floor_boom() + warp() + singing_parts()
    timber = timber_modes()
    hits = singing_threads() + scrape() + bobbin()
    for part in (shaft_jostles, frame_bumps, bobbin_rolls, bobbin_ticks, bobbin_jolts, shuttle_clacks,
                 reed_snaps, beater_knocks):
        hits = hits + part(timber)
    return (hits + room(hits) + beds)[None]


def low_pass(x):
    return signal.sosfilt(signal.butter(12, 16810, fs=SR, output="sos"), x)


def record(dry):
    thin = filtered(dry, 6, 54, "high")
    rounded = .62 * np.tanh(thin / .62)
    cut = signal.sosfilt(signal.ellip(8, 1, 30, 15800, fs=SR, output="sos"), rounded)
    return low_pass(cut)


dry = scene()
out = record(dry)
pcm_store(out)
```